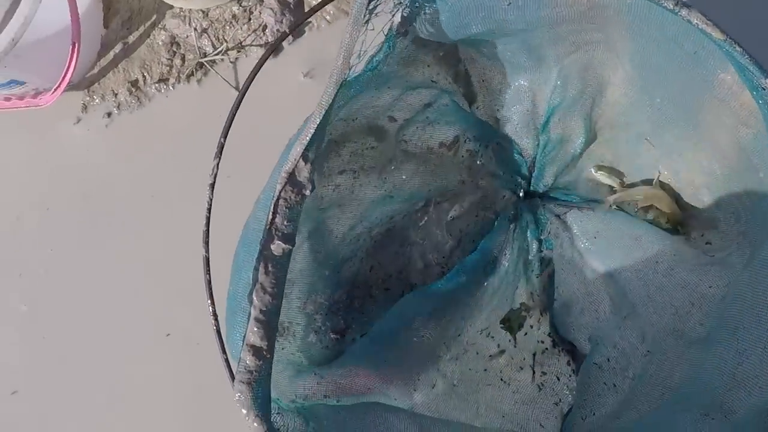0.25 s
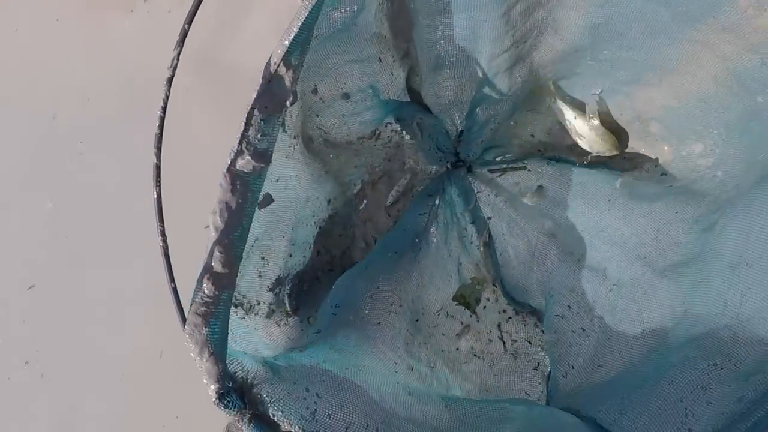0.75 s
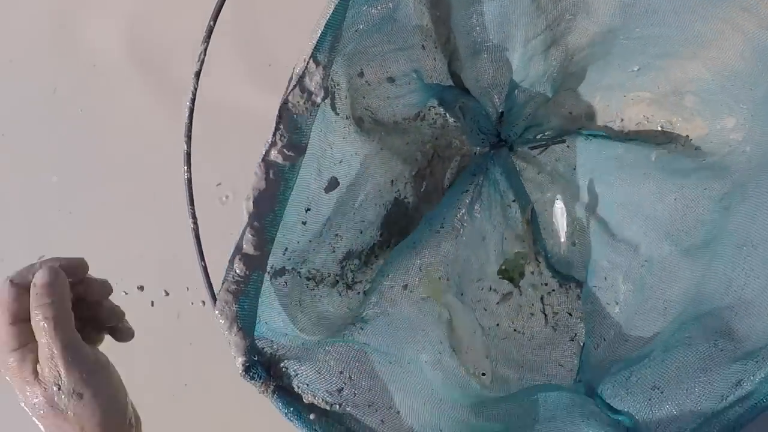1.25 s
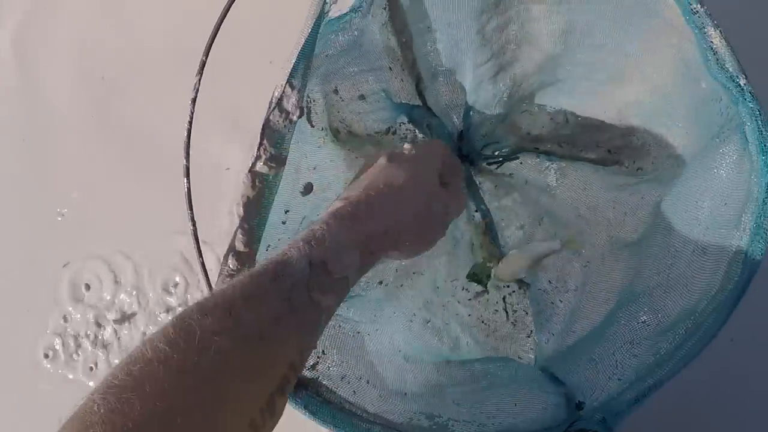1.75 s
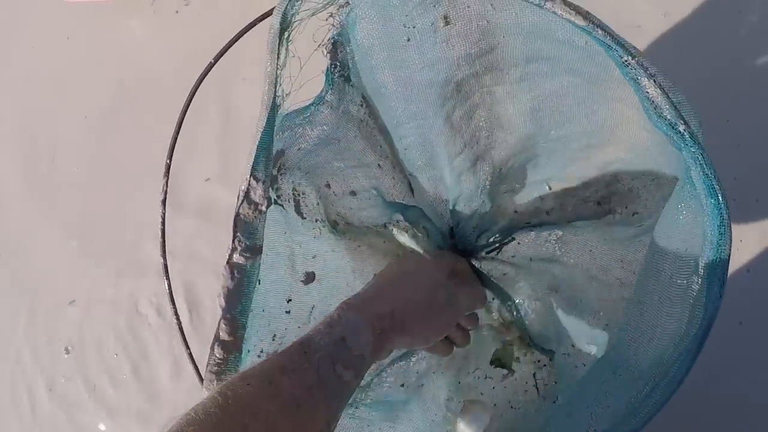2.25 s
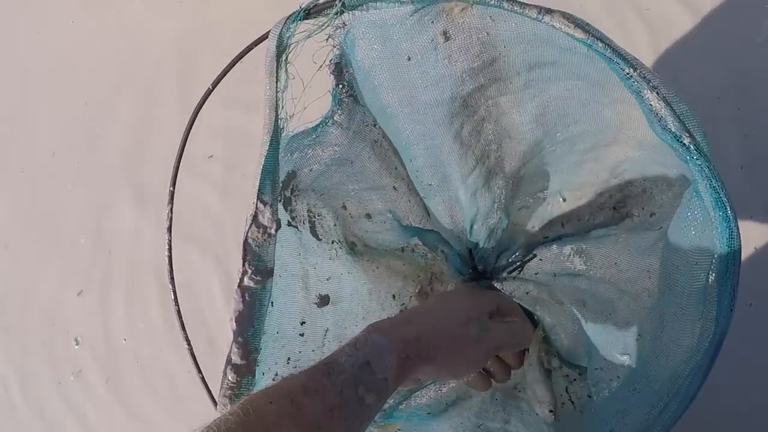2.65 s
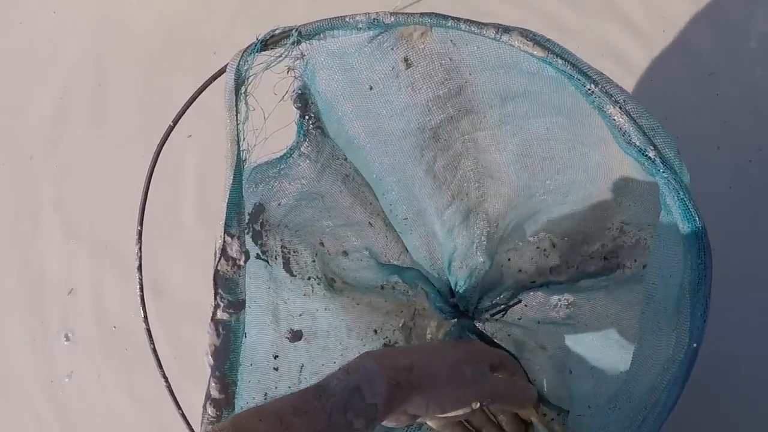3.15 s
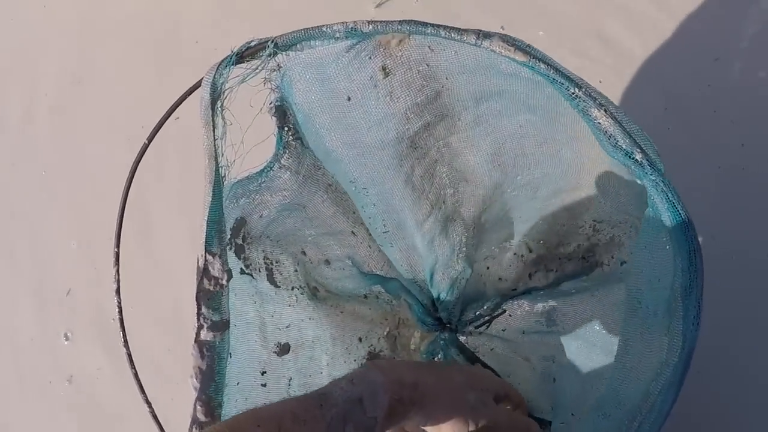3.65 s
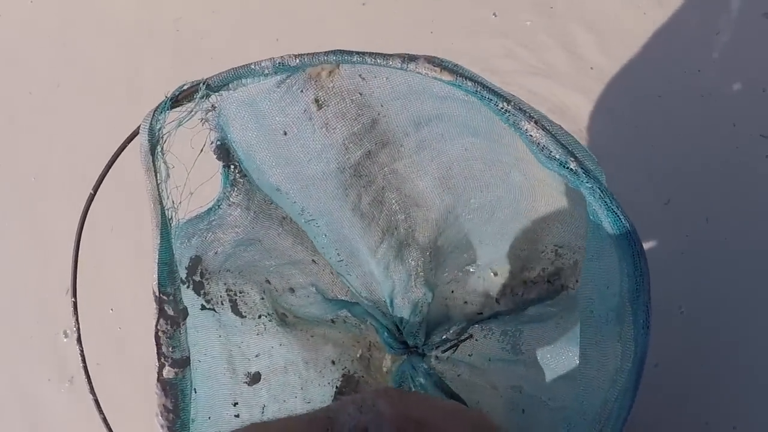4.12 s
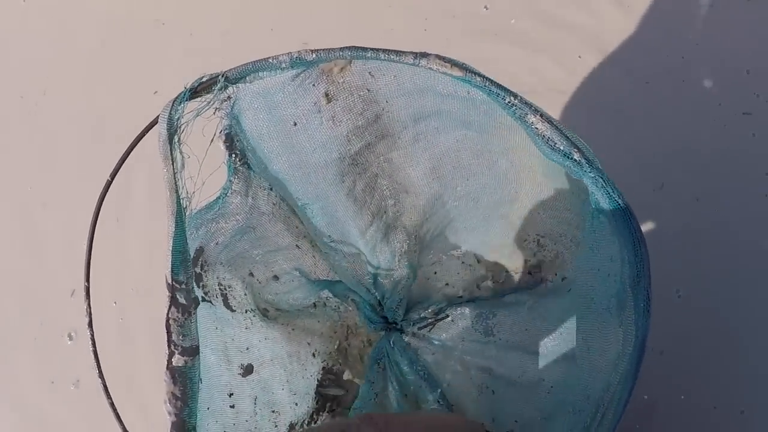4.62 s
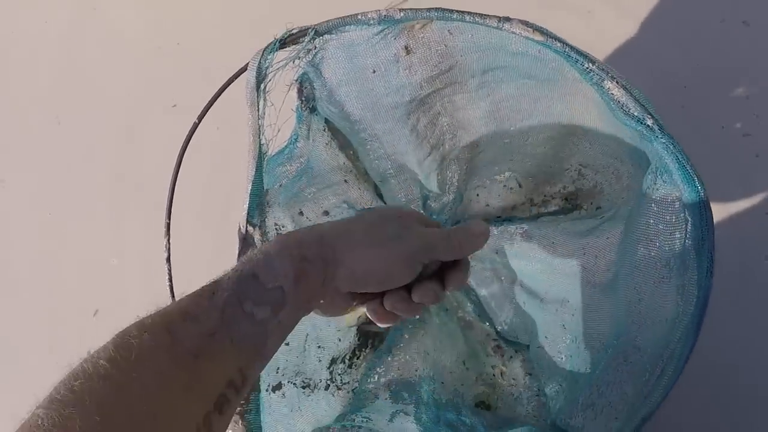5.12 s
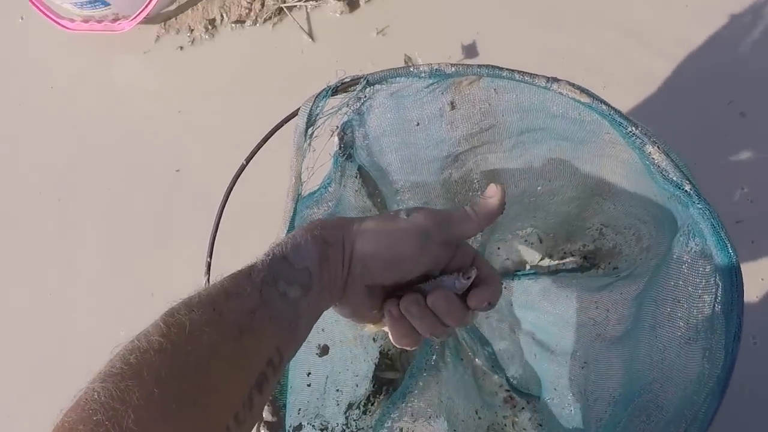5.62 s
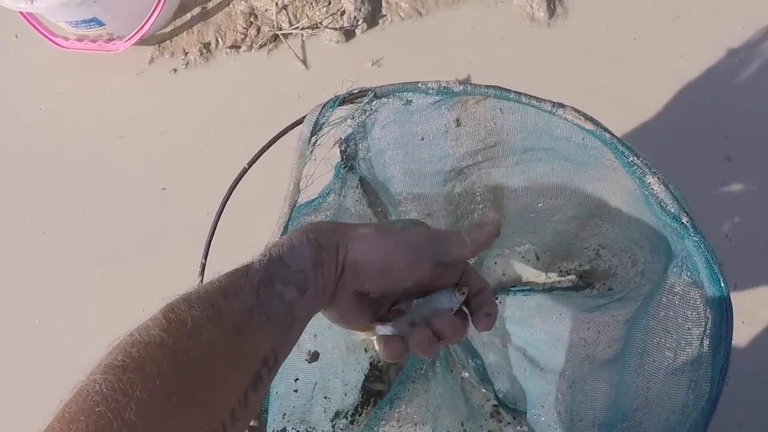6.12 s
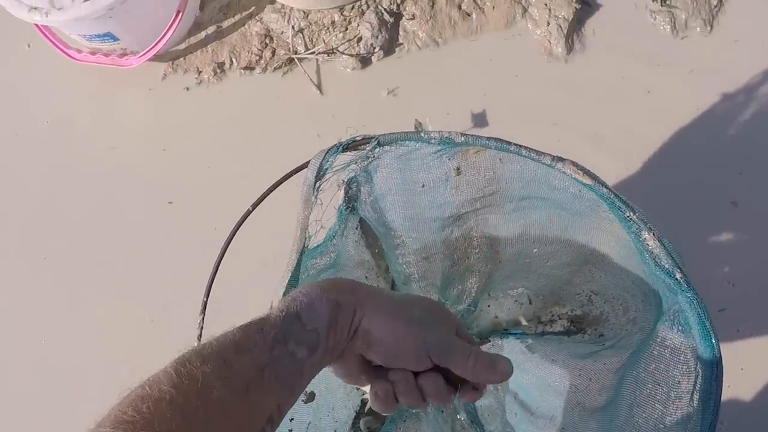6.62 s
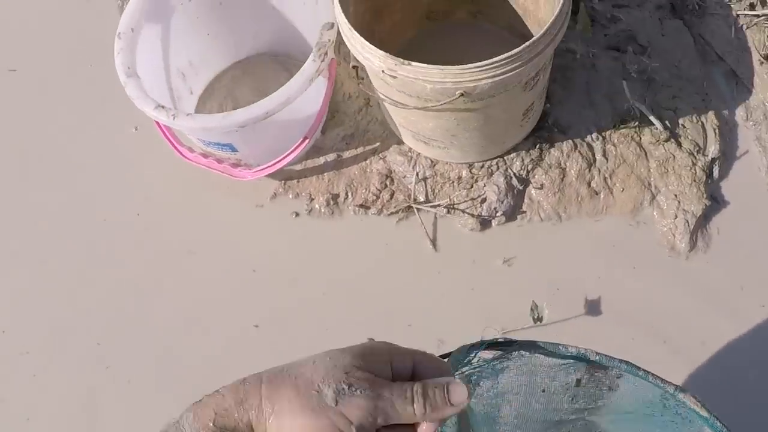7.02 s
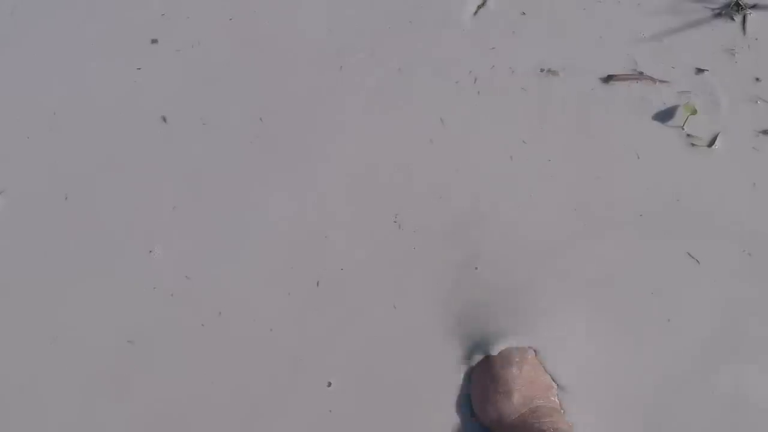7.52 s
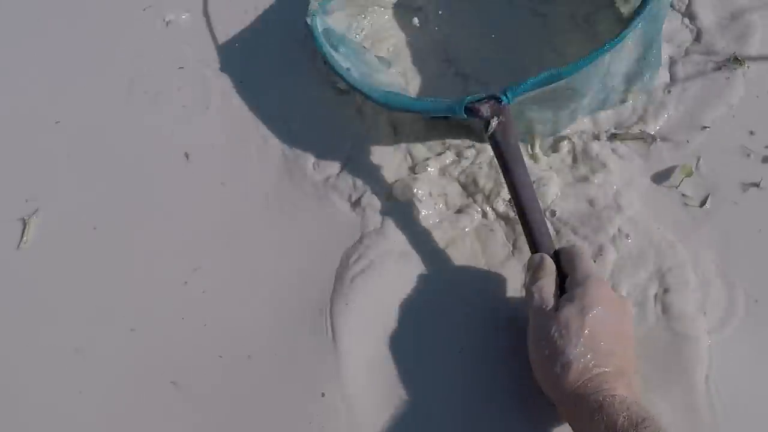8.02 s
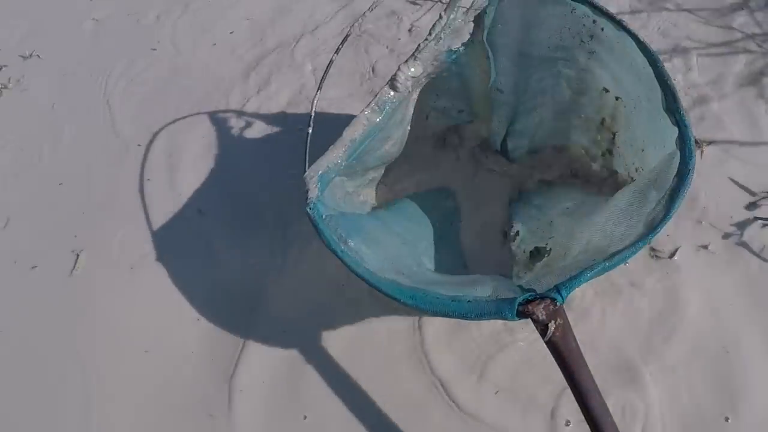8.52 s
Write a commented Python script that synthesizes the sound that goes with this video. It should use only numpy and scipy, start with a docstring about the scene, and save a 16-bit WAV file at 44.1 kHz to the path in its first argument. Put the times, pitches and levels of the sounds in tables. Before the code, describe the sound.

From the start to about 2 seconds, a small fish flaps in a wet net close to the microphone: quick, light slaps and spits of spray, with a few dull knocks through the frame. Drops plink, small bubbles blip and the mesh patters softly as it drains over a faintly lapping pond. From 2 to 5 seconds a hand picks through the net, making scattered wet clicks and drips, with one sharp little crack near 3.1 seconds and a cluster of brighter drops around 4.5. Between 5 and 7.5 seconds it is much quieter, with only occasional drips and soft bubbles. At about 7.8 seconds a low knock begins a louder stretch as the net is hauled out of the water, splashing, gurgling and fizzing. The loudest splash and drops come near 8.4 seconds, then the water settles quickly.

```python
"""Fish in a wet net

A small fish flaps in a muddy net held over a pond while a hand picks through it; later the net is
hauled out. Wet slaps scatter spray, drops plink, trapped bubbles ring and glide, and knocks reach
the cased camera through frame and handle, over lapping water and a fizz of draining mesh."""
import sys
import numpy as np
from scipy import signal
from scipy.io import wavfile
from scipy.ndimage import uniform_filter1d

SR = 44100
rng = np.random.default_rng(int(sys.argv[2]) if len(sys.argv) > 2 else 0)


def store_pcm(level_fs):
    """Save levels as 16-bit WAV."""
    pcm = np.round(np.clip(level_fs, -1, 1) * 32767).astype(np.int16)
    wavfile.write(sys.argv[1], SR, np.atleast_2d(pcm).T)


N = 386316

# background levels: time_s, lap_db, fizz_db
WATER_LEVELS = [(0, -56, -66), (.3, -56.5, -57.5), (.75, -59, -61.5), (1.7, -62.5, -60), (4.1, -64, -68.5),
                (4.45, -63, -68.5), (5.15, -62, -68.5), (5.5, -69.5, -73), (6.5, -68.5, -72.5),
                (7.548, -67, -70.5), (7.76, -55.5, -66.5), (7.851, -67, -41.5), (8.03, -56, -47),
                (8.22, -60.5, -60), (8.4, -61, -48), (8.52, -60.5, -60), (8.76, -63, -65)]
# water hiss as the case colours it: freq_hz, relative_db
SPRAY_SPECTRUM = [(300, 8.5), (1000, 5), (2000, 1), (3900, 9.5), (5000, 0.5), (6400, 3.5), (7600, -6.5),
                  (9000, -1), (11200, -30.5), (13000, -17), (15000, -12.5)]


def slaps_and_drops(spray, q=3.35, tail_db=-17, tail_t60_s=0.22, grain_db=4, plink_lead_s=0.001287):
    """Drops plink; slaps and drops throw spray: grainy pitched hiss, a broad body and treble."""
    # wet slaps of fish, fingers and mesh: peak_s, level_db, centre_hz, treble_relative_db, t60_s
    slaps = [(.0524, -43.5, 2430, -18, 0.038), (.0589, -41.5, 3800, -19, 0.023),
             (.0747, -53, 3600, -12, 0.17), (.1107, -47, 3460, -3, 0.026), (.264, -49.5, 3740, -14, 0.11),
             (.3344, -47.5, 3950, -0.5, 0.024), (.4846, -44, 3700, -7.5, 0.05),
             (.8391, -41.5, 3050, -10, 0.041), (.8509, -44, 2930, -37, 0.088),
             (.8619, -48, 3180, -39, 0.068), (.886, -52, 2270, -34, 0.06), (1.0425, -53, 3960, -4, 0.099),
             (1.0738, -41.5, 4100, -2, 0.029), (1.097, -48, 4400, -7, 0.096),
             (1.116, -46.5, 6100, -25, 0.04), (1.3193, -45, 3650, -5, 0.074),
             (1.4592, -52.5, 3160, 0, 0.12), (1.4857, -47, 5500, -8, 0.035),
             (1.5506, -40.5, 2600, -3, 0.018), (1.5567, -46, 3100, -0.5, 0.048),
             (1.627, -51, 3460, -20, 0.048), (1.684, -53.5, 4870, -4, 0.024),
             (1.8246, -43, 3570, -50, 0.023), (1.8334, -42.5, 2740, -32, 0.041),
             (1.875, -54.5, 5900, -13, 0.054), (2.0794, -43, 7700, -15, 0.066),
             (2.087, -35, 4000, -30, 0.013), (2.2695, -46, 4080, 0.5, 0.016),
             (2.3687, -63.5, 3740, 6, 0.18), (2.4506, -41.5, 3140, -14, 0.066),
             (2.4612, -39, 4000, 2, 0.053), (2.4787, -51.5, 4000, 6, 0.032),
             (2.7376, -51.5, 4550, -6, 0.072), (2.7473, -51.5, 3800, -1, 0.059),
             (2.885, -57, 660, -34, 0.11), (2.8917, -43.5, 3650, -45, 0.078),
             (3.073, -48, 1100, -28, 0.024), (3.074, -44, 3900, -24, 0.059),
             (3.0844, -40, 3300, -32, 0.021), (3.1946, -48, 4330, -1.5, 0.05),
             (3.5122, -49.5, 4150, -14, 0.042), (3.5409, -51.5, 3870, 4.5, 0.022),
             (3.616, -61.5, 3850, -1, 0.086), (3.6336, -55.5, 3450, -8, 0.045),
             (3.6582, -50.5, 4000, 5.5, 0.044), (3.8367, -57.5, 3970, 5.5, 0.044),
             (3.8504, -49.5, 4470, 0.5, 0.031), (4.0805, -64.5, 4340, 10, 0.1),
             (4.3153, -53.5, 4650, -10, 0.12), (4.4225, -59, 5100, 0.5, 0.18),
             (4.543, -47.5, 4180, -38, 0.018), (4.5509, -47.5, 5200, 1, 0.032),
             (4.843, -49, 5540, -31, 0.016), (5.0073, -62.5, 4450, -8, 0.072),
             (6.7386, -57, 2950, -12, 0.018), (7.7938, -57, 6750, -14, 0.39),
             (7.8176, -43.5, 3460, -12, 0.061), (7.8775, -38.5, 2820, -3, 0.044),
             (7.911, -51, 5950, -22, 0.23), (7.9731, -42, 3880, -6.5, 0.061),
             (8.0024, -48.5, 6000, -26, 0.068), (8.0964, -50, 3600, -9.5, 0.09),
             (8.1607, -52.5, 3460, -34, 0.06), (8.2561, -44.5, 3160, -9, 0.027),
             (8.3155, -62.5, 3600, 17.5, 0.059), (8.333, -54, 4500, 10.5, 0.077),
             (8.3525, -42, 3720, -20, 0.17), (8.3686, -27.5, 2450, -11, 0.012),
             (8.392, -49, 4020, -19, 0.081), (8.41, -39.5, 3840, -33, 0.054),
             (8.4178, -40, 3850, -31, 0.043)]
    # single drops landing: time_s, peak_db, pitch_hz
    drops = [(.1107, -39, 3450), (0.186, -42.5, 2450), (.201, -42, 3700), (0.2156, -43.5, 5430),
             (0.335, -41, 6470), (0.3606, -38.5, 3800), (.375, -48, 6100), (0.409, -45, 4040),
             (.4846, -39, 3560), (0.5374, -36.5, 5850), (0.605, -34, 1780), (0.648, -39.5, 3670),
             (.7792, -49.5, 7450), (0.926, -50, 6730), (1.042, -40, 5540), (1.043, -35, 3980),
             (1.074, -36.5, 4410), (1.2666, -45.5, 5300), (1.438, -43, 9220), (1.447, -38, 9070),
             (1.615, -50, 6150), (1.628, -36, 3630), (1.718, -43.5, 4440), (1.728, -48, 6500),
             (2.063, -46, 8540), (2.2695, -33.5, 4050), (2.3687, -48, 3730), (2.415, -44.5, 3000),
             (2.737, -41.5, 3970), (3.055, -43, 4830), (3.1966, -34, 3780), (3.333, -44, 5900),
             (3.4225, -44, 5900), (3.5134, -38, 4250), (3.616, -45, 3700), (3.6586, -37.5, 3600),
             (3.7042, -36.5, 5050), (3.8362, -37.5, 4200), (4.082, -41.5, 4140), (4.1666, -33, 3860),
             (4.1948, -39, 4210), (4.2717, -44, 3370), (4.2875, -42.5, 4270), (4.316, -43, 4430),
             (4.375, -43.5, 5260), (4.4353, -32.5, 5240), (4.469, -44, 5660), (4.4962, -39, 4680),
             (4.5266, -29.5, 3000), (4.545, -33.5, 4260), (4.5509, -26, 5500), (4.595, -41, 5360),
             (4.8267, -41.5, 5300), (5.156, -49, 4950), (5.499, -46.5, 3900), (5.5, -47.5, 5100),
             (5.5, -52.5, 7250), (5.527, -57, 4400), (5.733, -53, 2920), (5.793, -62, 3630),
             (6.322, -61, 6900), (6.3428, -48, 4280), (6.414, -42, 3940), (6.4912, -45, 4350),
             (6.519, -56, 6800), (6.5594, -45, 3800), (6.5595, -50, 4500), (6.626, -52, 3140),
             (6.626, -57, 4050), (6.702, -40, 2230), (6.953, -58.5, 6900), (7.0332, -54, 2860),
             (7.765, -48, 6030), (7.843, -38, 5820), (7.961, -46, 3620), (8.002, -40, 6100),
             (8.066, -40.5, 3200), (8.157, -46, 4700), (8.182, -51, 6040), (8.282, -44, 4130),
             (8.3155, -39, 3760), (8.3377, -34, 6070), (8.353, -28, 3970), (8.367, -20.5, 2650),
             (8.368, -20, 4140), (8.4169, -29, 4030), (8.46, -40, 7800), (8.5043, -45, 10100)]
    out, body_power, treble_power = np.zeros((3, N))
    t = np.arange(5000) / SR
    for time_s, peak_db, pitch_hz in drops:
        cycles = 46 * (pitch_hz / 4000) ** 0.72  # big low drops ring fewer cycles
        add(out, time_s - plink_lead_s, gain_of(peak_db) * plink(pitch_hz, cycles))
    splashes = [(time_s, peak_db - 25, pitch_hz, -20, 0.078) for time_s, peak_db, pitch_hz in drops]
    for peak_s, level_db, centre_hz, treble_db, t60_s in slaps + splashes:
        hiss, grain = rng.standard_normal((2, len(t)))
        rise_s = 0.15 * t60_s
        decay_s = np.maximum(t - rise_s, 0)
        decay = gain_of(-60 * decay_s / t60_s) + gain_of(tail_db - 60 * decay_s / tail_t60_s)
        lumps_db = grain_db * np.clip(smoothed(grain, 44), -2, 2)
        envelope = np.minimum(t / rise_s, 1) ** 2 * decay * gain_of(level_db + lumps_db)
        start_s = peak_s - rise_s
        add(out, start_s, envelope * narrow_band(hiss, centre_hz, q))
        add(body_power, start_s, envelope ** 2)
        add(treble_power, start_s, (envelope * gain_of(treble_db)) ** 2)
    body = unit_rms(filtered(spray, [450, 7300], "band"))
    treble = unit_rms(filtered(spray, 7300, "high"))
    return out + np.sqrt(body_power) * body + np.sqrt(treble_power) * treble


def bubbles(rise_cycles=2.5):
    """Trapped bubbles ring as gliding sines; busy water makes them waver and froth."""
    # start_s, level_db, pitch_hz, glide_octaves_per_s, ring_s
    trapped = [(.276, -43, 684, 34, 0.1), (.452, -38, 2095, -12, 0.033), (.482, -37, 723, 6, 0.064),
               (0.503, -39.5, 820, 37.5, 0.043), (.58, -38.5, 1135, 14, 0.039), (.6, -50, 623, 13, 0.14),
               (.86, -49.5, 951, 12.5, 0.12), (.9048, -43, 1210, 18.5, 0.045),
               (1.043, -39.5, 860, -5, 0.021), (1.044, -42, 1890, -4, 0.039), (1.105, -39, 784, 92, 0.0091),
               (1.544, -36.5, 1190, 4.5, 0.027), (1.608, -53.5, 746, 5.5, 0.086),
               (1.645, -36.5, 1670, 13.5, 0.023), (1.659, -41.5, 2130, 2, 0.053),
               (1.8817, -40, 1334, 6.5, 0.048), (1.982, -41, 2930, -57, 0.035),
               (2.1557, -40, 2466, -38, 0.029), (2.7335, -41.5, 610, -11, 0.0087),
               (2.942, -47, 1890, 0, 0.034), (3.052, -37.5, 1806, -9, 0.034),
               (3.3254, -37.5, 1102, -4, 0.058), (3.4397, -45, 2160, -13, 0.027),
               (3.71, -54, 774, -22, 0.054), (4.1965, -51.5, 873, -1, 0.074),
               (4.4646, -49.5, 1780, -1, 0.022), (4.5056, -52, 506, 19.5, 0.045),
               (4.7733, -36.5, 2960, -8, 0.032), (4.812, -50.5, 1670, -13, 0.029),
               (4.8237, -34.5, 1378, -6.5, 0.044), (4.9806, -41, 537, 18, 0.016),
               (5.4981, -59.5, 510, 34, 0.034), (6.059, -60, 488, 12, 0.048), (6.301, -45, 1176, -2, 0.052),
               (6.613, -55.5, 470, 27.5, 0.034), (6.6987, -58, 490, 31.5, 0.041),
               (6.7854, -57, 553, 4, 0.079), (6.997, -52.5, 2450, -5.5, 0.033),
               (7.0142, -52.5, 513, 11.5, 0.053), (7.4579, -58, 524, 22.5, 0.048),
               (7.7583, -49.5, 1190, 6.5, 0.048), (7.795, -44, 1400, -11, 0.03),
               (7.821, -31, 1493, 19.5, 0.033), (7.83, -36.5, 1260, 2, 0.029),
               (7.867, -39, 1130, -1.5, 0.068), (7.893, -32.5, 1555, -29, 0.065),
               (7.902, -36, 910, -4, 0.027), (7.9424, -25, 669, -0.5, 0.055),
               (7.9786, -37.5, 1263, 2, 0.14), (8.01, -39.5, 1052, -6.5, 0.058),
               (8.0674, -48.5, 2070, 0.5, 0.041), (8.1112, -45, 2600, -7.5, 0.032),
               (8.143, -46, 1910, 11, 0.042), (8.161, -39, 1986, 0, 0.026), (8.158, -53, 990, -1.5, 0.053),
               (8.165, -55, 1195, 18, 0.1), (8.256, -59, 1070, 10, 0.044), (8.33, -36, 1585, -10, 0.025),
               (8.348, -35.5, 936, 3, 0.067), (8.39, -36, 942, 3, 0.023)]
    out = np.zeros(N)
    time_s, _, fizz_db = np.transpose(WATER_LEVELS)
    for start_s, level_db, pitch_hz, glide, ring_s in trapped:
        rise_s, ring_s = rise_cycles / pitch_hz, np.clip(ring_s, .01, .12)
        t = np.arange(round((rise_s + ring_s) * SR))[:6000] / SR
        busy = np.clip((np.interp(start_s, time_s, fizz_db) + 71) / 14, .2, 1)
        waver, wobble, froth = (busy * smoothed(rng.standard_normal(6000), samples)[:len(t)]
                                for samples in (120, 120, 30))
        octaves = glide * (t if glide > 0 else np.minimum(t, .012))  # a fall settles at once
        attack = np.sin(np.pi / 2 * np.minimum(t / rise_s, 1)) ** 2
        flutter = 1 + .45 * np.tanh(wobble) + .35 * froth
        hold = 1.5 + .06 * max(glide, 0)  # a riser holds, then bursts
        decay_db = -60 * (np.maximum(t - rise_s, 0) / ring_s) ** hold
        decay_db -= 250 * np.maximum(octaves - .85, 0)
        turns = np.cumsum(pitch_hz * 2 ** np.clip(octaves, -.25, 2) * (1 + .04 * waver)) / SR
        add(out, start_s, gain_of(level_db + decay_db) * attack * flutter * np.sin(2 * np.pi * turns))
    return out


def knocks(sag=0.29, sag_s=0.0021, rise_s=0.0011, cycles=11, thud_db=-8, thud_hz=400):
    """Knocks through frame and handle: a few low cycles sagging in pitch, in a dull wet thud."""
    # start_s, level_db, pitch_hz
    hits = [(0.051, -25.5, 380), (0.089, -38, 318), (.172, -47.5, 487), (0.447, -41, 394),
            (0.485, -29, 300), (0.535, -30.5, 239), (0.884, -41.5, 243), (1.074, -30.5, 303),
            (1.146, -39, 261), (1.483, -28.5, 214), (2.077, -37.5, 438), (6.647, -49, 191),
            (6.961, -55, 170), (7.519, -44, 243), (7.555, -49, 242), (7.761, -33.5, 170.5)]
    out, t = np.zeros(N), np.arange(4000) / SR
    for start_s, level_db, pitch_hz in hits:
        thud = gain_of(thud_db) * unit_rms(filtered(rng.standard_normal(len(t)), thud_hz, "low"))
        envelope = gain_of(-60 * t * pitch_hz / cycles) * (1 - np.exp(-(t / rise_s) ** 2))
        envelope /= envelope.max()
        turns = np.cumsum(pitch_hz * (1 + sag * np.exp(-t / sag_s))) / SR
        add(out, start_s, gain_of(level_db) * envelope * (np.sin(2 * np.pi * turns) + thud))
    return out


def cracks():
    """A wet tail or a bursting film cracks: a ring of very few cycles."""
    # time_s, peak_db, pitch_hz
    hits = [(.58, -33.5, 2240), (0.632, -30.5, 1470), (0.8356, -28, 1220), (0.8427, -26, 2050),
            (.8865, -35, 1260), (1.107, -27.5, 1840), (1.559, -26, 3170), (1.678, -37.5, 1700),
            (1.685, -38, 5030), (3.0858, -19, 3310), (4.0963, -33.5, 5100), (8.163, -32, 3060),
            (8.2567, -24, 3200)]
    out = np.zeros(N)
    for time_s, peak_db, pitch_hz in hits:
        add(out, time_s - 1 / pitch_hz, gain_of(peak_db) * plink(pitch_hz, cycles=9))
    return out


def mist(band_hz=(11400, 15500), t60_s=0.0061, tail_db=-16, tail_t60_s=0.081):
    """Fine spits of mist: short, very high hiss with a faint tail."""
    # start_s, level_db
    spits = [(0.481, -48), (0.632, -46.5), (0.835, -51), (1.0415, -56.5), (1.5579, -46), (2.081, -39),
             (2.4588, -43), (3.196, -62), (3.541, -50)]
    out, t = np.zeros(N), np.arange(3000) / SR
    envelope = gain_of(-60 * t / t60_s) + gain_of(tail_db - 60 * t / tail_t60_s)
    for start_s, level_db in spits:
        hiss = unit_rms(filtered(rng.standard_normal(len(t)), band_hz, "band"))
        add(out, start_s, gain_of(level_db) * envelope * hiss)
    return out


def sizzles(centre_hz=9350, width_hz=600, rise_s=.01):
    """A narrow, high sizzle rings on after a flap: quick to swell, slow to die."""
    # start_s, level_db, t60_s
    high_rings = [(1.44, -59, .6), (2.455, -55, .25)]
    out, t = np.zeros(N), np.arange(12000) / SR
    for start_s, level_db, t60_s in high_rings:
        hiss = narrow_band(rng.standard_normal(len(t)), centre_hz, centre_hz / width_hz)
        add(out, start_s, gain_of(level_db - 60 * t / t60_s) * np.minimum(t / rise_s, 1) * hiss)
    return out


def patter(start_db=-56, fade_db_per_s=11.5):
    """The freshly lifted net patters, then drains dry."""
    level_db = start_db - fade_db_per_s * np.arange(N) / SR
    return gain_of(level_db) * droplets(2100, 8500, per_s=1200, cycles=32, spread_db=5, pitches=10)


def fizz(fine_drops):
    """A smooth background hiss in quiet moments; strong draining brings spray, droplets and bubbles."""
    # freq_hz, relative_db
    hiss_spectrum = [(500, 7), (1000, 2), (4000, -3), (7000, -8), (10000, -10.5), (12500, -29),
                     (15000, -30)]
    time_s, _, fizz_db = np.transpose(WATER_LEVELS)
    level_db = np.interp(np.arange(N) / SR, time_s, fizz_db)
    hiss = patchy_noise(hiss_spectrum, patch_db=1)
    gurgle = droplets(500, 2800, per_s=400, cycles=30, spread_db=5.5, pitches=8)
    spray = with_resonances(patchy_noise(SPRAY_SPECTRUM, patch_db=6))
    churn = 0.5 * spray + 0.4 * fine_drops + 0.22 * gurgle
    churn_share = np.clip((level_db + 64.5) / 14, 0, 1)
    return gain_of(level_db) * ((1 - churn_share) * hiss + churn_share * churn)


def lapping():
    """Pond water laps: low, drifting noise."""
    # freq_hz, relative_db
    lap_spectrum = [(110, -4.5), (177, 2.5), (250, 1.5), (580, -6.5), (850, -10.5), (1500, -17),
                    (4000, -36), (9000, -42.5)]
    time_s, lap_db, _ = np.transpose(WATER_LEVELS)
    level_db = np.interp(np.arange(N) / SR, time_s, lap_db)
    return gain_of(level_db) * patchy_noise(lap_spectrum, patch_db=3)


def droplets(low_hz, high_hz, per_s, cycles, spread_db, pitches=11):
    """Many small droplets or bubbles of uneven size ring at random times; rms 1."""
    impulses = gain_of(spread_db * np.minimum(rng.exponential(1, N), 3))
    impulses *= rng.random(N) < per_s / SR
    pitch_index = rng.integers(0, pitches, N)
    out = np.zeros(N)
    for k, pitch_hz in enumerate(np.geomspace(low_hz, high_hz, pitches)):
        stretch, bend = rng.uniform(-1.74, 1, 2)
        ring = plink(pitch_hz, cycles * 2 ** stretch, glide=0.04 + 0.08 * bend, rise_share=0.082)
        rings = signal.oaconvolve(impulses * (pitch_index == k), ring)[:N]
        out += gain_of(db_at(SPRAY_SPECTRUM, pitch_hz)) * rings
    return unit_rms(out)


def plink(pitch_hz, cycles, glide=0, rise_share=.11):
    """A short ring, peak about 1, whose decay spans 60 dB over `cycles`."""
    turns = np.arange(round(cycles / pitch_hz * SR)) * pitch_hz / SR
    envelope = (1 - np.exp(-(turns / (rise_share * cycles)) ** 2)) * gain_of(-60 * turns / cycles)
    return envelope / envelope.max() * np.sin(2 * np.pi * turns * (1 + glide * turns / cycles))


def with_resonances(spray):
    """Adds the bands in which spray rings on; rms 1."""
    # centre_hz, width_hz, gain_db
    bands = [(2450, 250, -4), (3850, 400, 1), (6230, 350, -1), (9420, 300, 2)]
    ringing = sum(gain_of(gain_db) * signal.lfilter(*signal.iirpeak(hz, hz / width_hz, SR), spray)
                  for hz, width_hz, gain_db in bands)
    return unit_rms(spray + ringing)


def patchy_noise(spectrum, patch_db):
    """Noise whose spectrum drifts in small random patches; rms 1."""
    frames, freq_hz = N // 128 + 5, np.fft.rfftfreq(512, 1 / SR)
    real, imag, patches = rng.standard_normal((frames, 257, 3)).T
    patches = smoothed(uniform_filter1d(patches, size=6, axis=0), 4)
    bins = (real + 1j * imag) * gain_of(db_at(spectrum, freq_hz)[:, None] + patch_db * patches)
    return unit_rms(signal.istft(bins, nperseg=512, noverlap=384)[1][:N])


def narrow_band(x, centre_hz, q):
    b, a = signal.iirpeak(centre_hz, q, SR)
    return unit_rms(signal.lfilter(b, a, signal.lfilter(b, a, x)))


def filtered(x, edges_hz, kind):
    return signal.sosfilt(signal.butter(4, edges_hz, kind, fs=SR, output="sos"), x)


def smoothed(x, samples):
    return unit_rms(uniform_filter1d(x, size=samples))


def unit_rms(x):
    return x / np.sqrt(np.mean(x ** 2) + 1e-20)


def gain_of(db):
    return 10 ** (np.asarray(db) / 20)


def db_at(spectrum, freq_hz):
    points_hz, points_db = np.transpose(spectrum)
    return np.interp(np.log(freq_hz + 1), np.log(points_hz + 1), points_db)


def add(mix, start_s, sound):
    part = mix[round(start_s * SR):][:len(sound)]
    part += sound[:len(part)]


def stereo(mid):
    """Nearly centred; the top treble spreads and leans left."""
    # random-phase side signal: freq_hz, re_mid_db
    spread = [(1000, -62.5), (10000, -24), (12500, 1), (16000, -3)]
    # in-phase side signal: freq_hz, re_mid_db
    lean = [(9500, -71), (12500, -13)]
    freq_hz, _, bins = signal.stft(mid, SR, nperseg=256)
    scatter = np.exp(2j * np.pi * rng.random(bins.shape[::-1]).T)
    side_gain = gain_of(db_at(spread, freq_hz))[:, None] * scatter
    side_gain += gain_of(db_at(lean, freq_hz))[:, None]
    side = signal.istft(bins * side_gain, SR, nperseg=256)[1][:N]
    return np.array([mid + side, mid - side])


def scene():
    """Fish, hand and net over the background water."""
    fine_drops = droplets(1700, 11000, per_s=2600, cycles=24, spread_db=5)
    spray = with_resonances(patchy_noise(SPRAY_SPECTRUM, patch_db=5) + 0.6 * fine_drops)
    background = lapping() + fizz(fine_drops) + patter()
    net = slaps_and_drops(spray) + bubbles() + knocks() + cracks() + mist() + sizzles()
    return stereo(net + background)


def record(dry, stopband_hz=126, top_hz=15350):
    """A steep wind filter removes the bass; a low-pass limits the band."""
    wind_filter = signal.cheby2(8, 26, stopband_hz, "high", fs=SR, output="sos")
    low_pass = signal.firwin(255, top_hz, window=("kaiser", 9), fs=SR)
    return signal.oaconvolve(signal.sosfilt(wind_filter, dry), low_pass[None], "same")


dry = scene()
out = record(dry)
store_pcm(out)
```